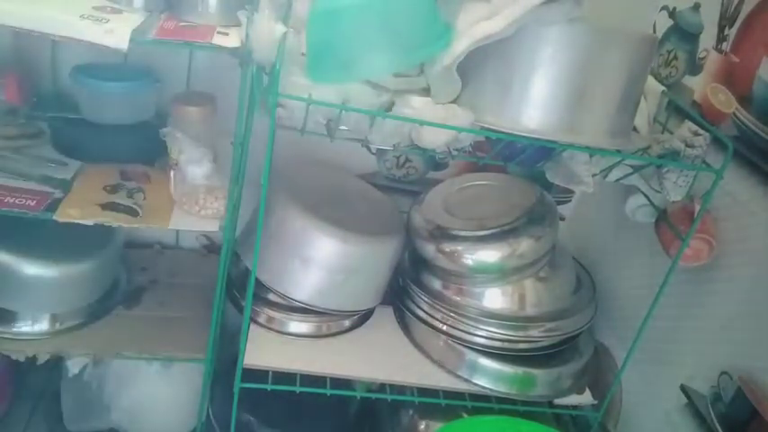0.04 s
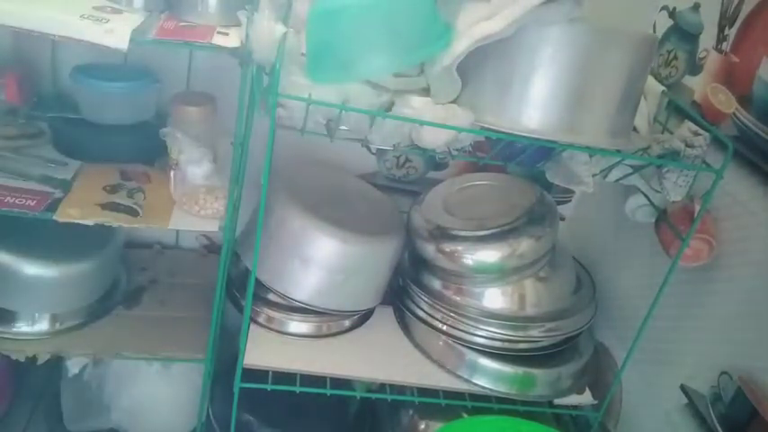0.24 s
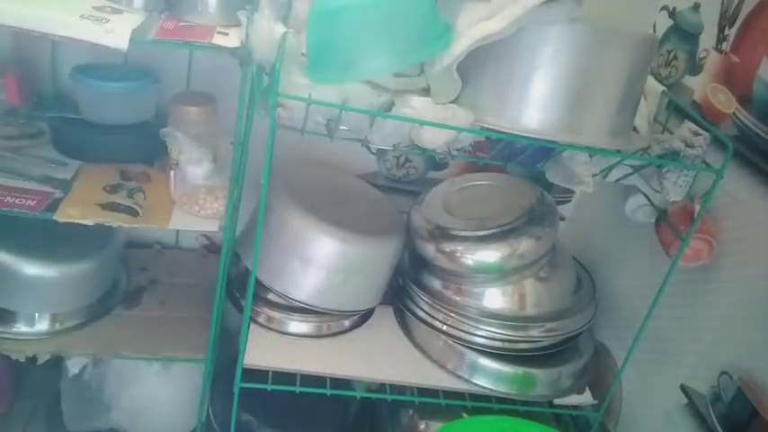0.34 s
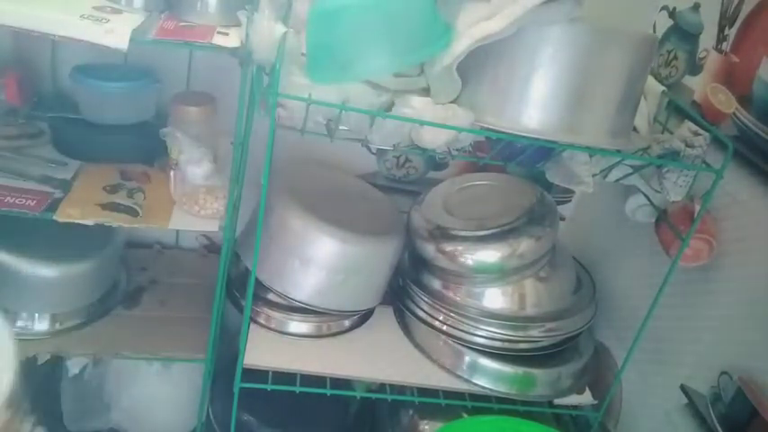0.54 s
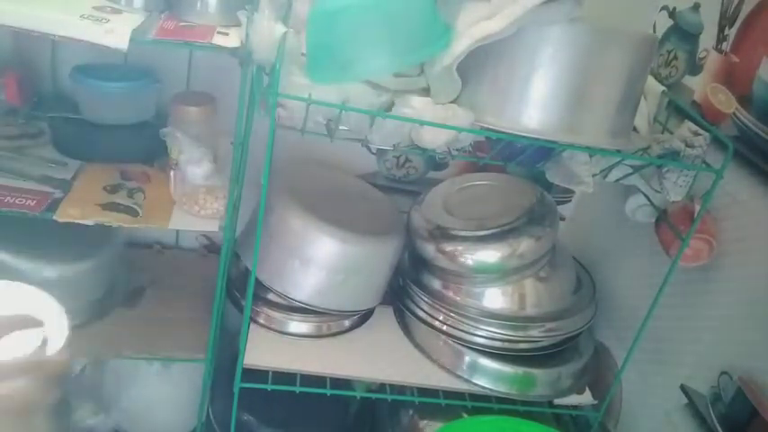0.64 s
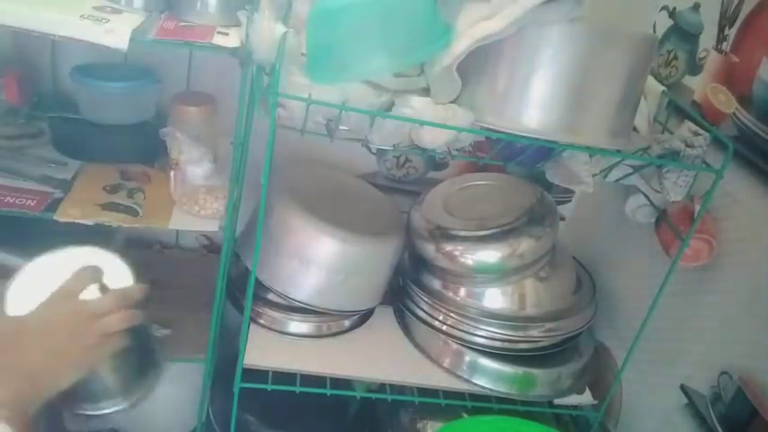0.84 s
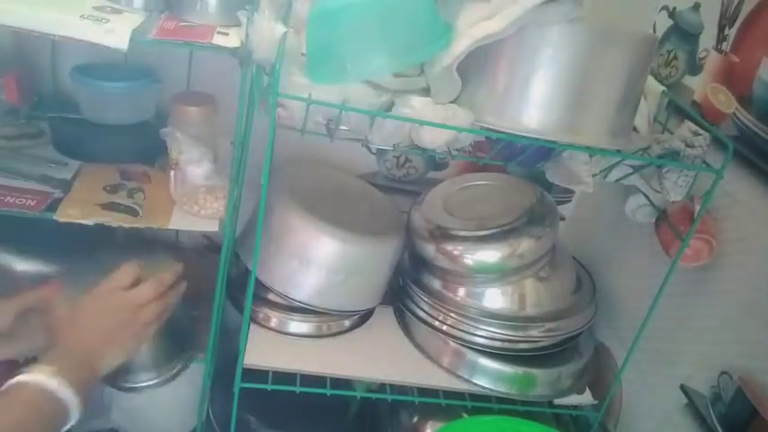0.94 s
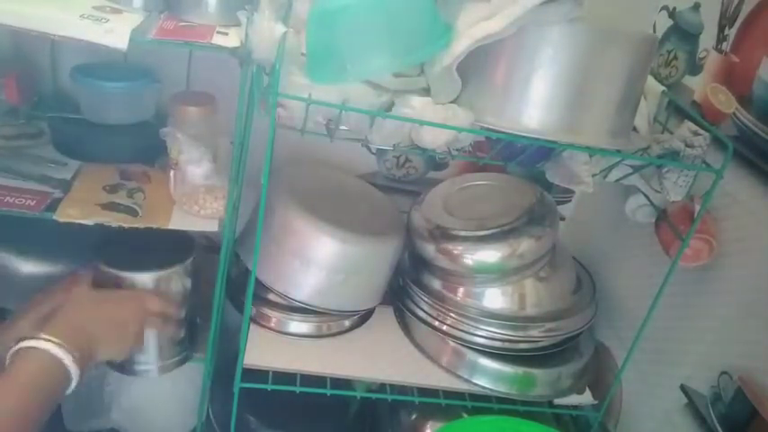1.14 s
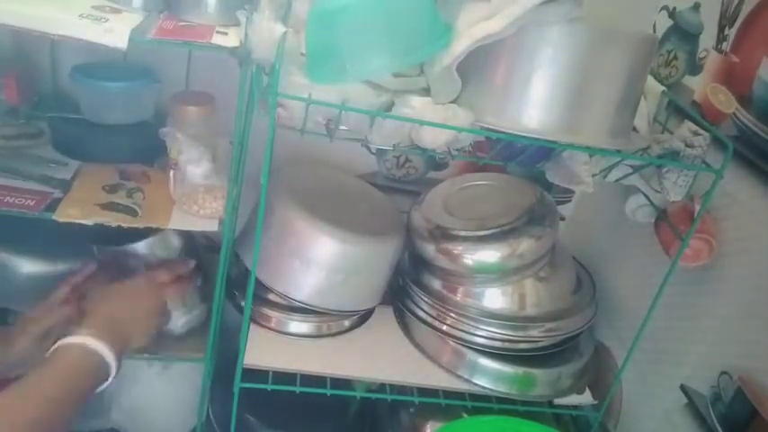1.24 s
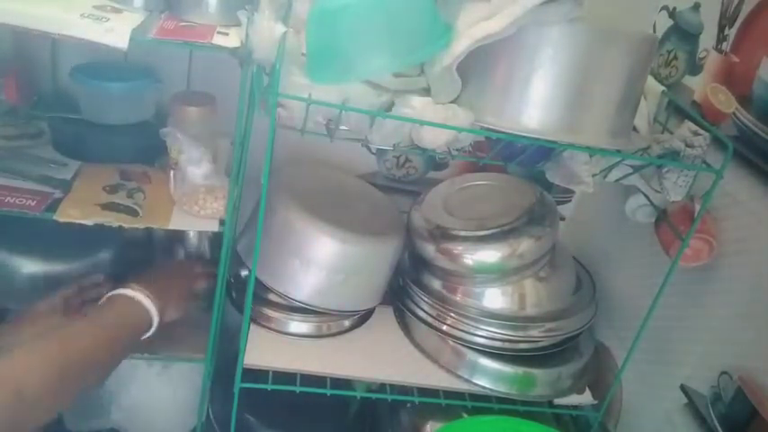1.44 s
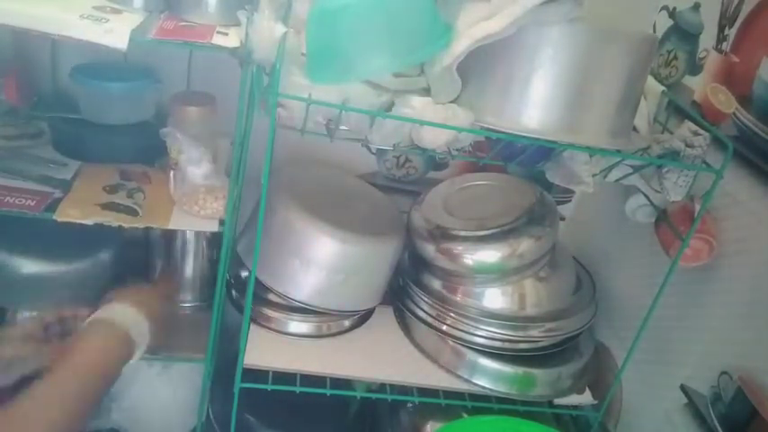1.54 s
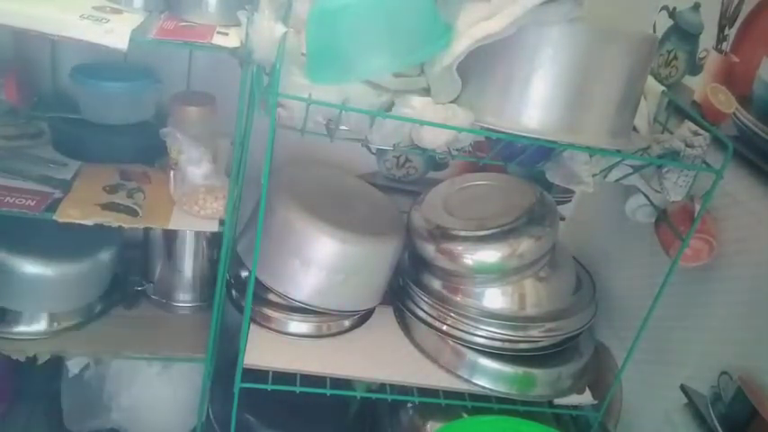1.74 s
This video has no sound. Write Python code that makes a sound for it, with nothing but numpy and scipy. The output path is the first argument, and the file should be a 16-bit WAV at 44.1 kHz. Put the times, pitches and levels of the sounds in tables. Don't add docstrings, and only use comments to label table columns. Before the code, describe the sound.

Stainless steel dishes clank on a wire rack. Faint hum and a bangle tick at 0.1 s, then bright plates clash at 0.2 and 0.35, ringing until 0.5. Soft ticks near 0.6 fade into a gated hush. A tumbler clanks at 0.9, a bowl at 1.2, then lid and pot clatter densely from 1.27 to 1.5. Clear rings fade; a faint low motor lingers. Small kitchen, right channel only.

```python
import sys
import numpy as np
from scipy import signal
from scipy.fft import rfft, irfft, next_fast_len
from scipy.io import wavfile

SR = 44100
rng = np.random.default_rng(int(sys.argv[2]) if len(sys.argv) > 2 else 0)


def store_pcm(level_fs):
    pcm = np.round(np.clip(level_fs, -1, 1) * 32767).astype(np.int16)
    wavfile.write(sys.argv[1], SR, np.atleast_2d(pcm).T)


N = 79380

# (time [s], sheen peak [dB], clank peak [dB], thump peak [dB], t60 [s])
BLOWS = [(0.1975, -17, -28, -44, 0.13), (0.2168, -16, -17.5, -34, 0.26), (0.2299, -9, -24, -39.5, 0.29),
         (0.3498, -11, -27.5, -37.5, 0.24), (0.362, -14, -34, -64, 0.32), (.41, -28, -40, -49.5, 0.46),
         (0.9029, -16, -26, -30.5, 0.28), (0.9477, -14, -33, -34.5, 0.47),
         (0.9677, -16.5, -19.5, -32.5, 0.24), (1.0391, -22, -60, -35, 0.27),
         (1.0745, -17, -34.5, -33, 0.16), (1.1852, -16.5, -27, -37.5, 0.42), (1.267, -12, -33.5, -33, 0.26),
         (1.279, -15.5, -38, -41, .22), (1.292, -18, -38, -44, .2), (1.335, -15, -34, -44, 0.26),
         (1.3799, -14, -36, -40, 0.3), (1.401, -19, -27, -27, 0.18), (1.4453, -22, -28.5, -23.5, 0.22),
         (1.4665, -14, -26, -36, 0.2), (1.5194, -26, -32.5, -29, 0.17)]
# (time [s], sheen peak [dB], clank peak [dB], thump peak [dB], t60 [s])
TICKS = [
    (.111, -36, -59, -64, 0.14),
    (.163, -40.5, -63, -82, 0.23),
    (.188, -35, -46, -56.5, .2),
    (.588, -36, -57.5, -71, 0.14),
    (.668, -42, -57, -55, .15),
    (.848, -58.5, -71, -79, 0.18),
    (1.597, -54, -56.5, -54, .2),
]
# (frequency [Hz], level per mode [dB])
SHEEN = [(4300, -24), (5300, -6.5), (6300, 1.5), (9000, -0.5), (11300, -1), (12500, -11.5), (15500, -16)]
CLANK = [(700, -21), (1100, -1), (2400, -1.5), (3600, -1), (4600, -10), (6000, -20.5)]
THUMP = [(60, -46), (150, -41.5), (280, -2), (600, 1.5), (900, -1.5), (1300, -32.5)]
# (frequency [Hz], ratio [-])
RING_LENGTH = [(200, 0.59), (1000, 1.11), (4000, 1), (8000, 2.46), (15000, 1.13)]
# (frequency [Hz], level [dB], t60 [s])
PLATE = [(640, -4, .12), (1050, 5, .2), (2342, -10, .4), (3540, -3, .15), (5932, -2, .19), (7704, -1, .5),
         (8522, -5, .4), (8888, -3, .3), (9878, -2, .3), (10890, -2, .3)]
PLATE_AGAIN = [(2342, -6, .2), (3542, -13, .3), (4646, -15, .4), (5700, 2, .12), (6288, 2, .26),
               (7978, 2, .19), (8947, 1, .45), (9329, -3, .4), (9695, -7, .8), (10090, -5, .45),
               (11560, -2, .19)]
TUMBLER = [(324, 0, .09), (431, -3, .08), (694, -9, .2), (1051, -6, .12), (2340, 2, .6), (3351, -8, .15),
           (3548, -8, .3), (5351, -8, .12)]
TUMBLER_AGAIN = [(1297, 2, .12), (1515, -11, .3), (1854, -3, .12), (2340, 1, .55), (2568, -12, .27),
                 (3526, -9, .2), (5604, -5, .15), (6013, -6, .3), (6412, -9, .4), (7537, -7, .18),
                 (7938, -6, .2)]
BOWL = [(1550, -10, .15), (2110, 0, .18), (2358, -6, .3), (2524, 3, .1), (3150, -6, .05), (6379, -6, .45),
        (6611, -3, .3), (8920, -6, .18), (10260, -8, .24)]
LID = [(3570, -5, .12), (3990, 5, .06), (5350, 1, .07), (5717, -1, .3), (6072, -2, .25), (6665, -1, .18),
       (7650, -4, .35), (8037, -3, .3), (8320, -6, .4), (9485, -7, .4)]
POT = [(880, 1, .07), (1057, 4, .08), (1301, 5, .07), (1650, 5, .06), (1542, -8, .5), (1917, 9, .05),
       (2116, -3, .13), (3700, -4, .05), (6830, 4, .08)]
POT_AGAIN = [(4075, 3, .077), (4635, 1, .12), (4834, -9, .2), (5222, -6, .2), (6083, 0, .1),
             (6724, -5, .19), (7607, -6, .3), (8242, -8, .4)]
CUP = [(2110, 1, .33), (2859, -24, .5), (4430, -23, .4)]
PLATE_FREED = [(1050, -3, .35), (1518, -8, .5), (1545, 0, .6), (4911, -4, .5), (8960, -6, .5)]
BANGLE = [(5150, -8, .16), (6950, 1, .14), (7300, -2, .1), (10260, 3, .16), (14150, -2, .14)]
BANGLE_PAIR = [(695, 0, .09), (2700, -9, .1), (4400, -13, .12), (7700, -6, .15), (10800, -4, .14),
               (11250, -4, .12)]
PLATE_RIM = [(1728, 0, .25), (4834, -1, .38), (1545, -11, .5), (3391, -6, .25)]
RACK = [(280, -6, .2), (426, -5, .15), (572, 0, .2), (623, 0, .25)]
PLATE_EDGE = [(3550, -5, .1), (7600, 0, .15), (9900, -4, .12)]
LID_AGAIN = [(705, -8, .2), (3311, -4, .2), (3575, 0, .12), (6368, 2, .11), (7817, -3, .4), (8990, 0, .19),
             (10410, -3, .2)]
CUP_RIM = [(4430, -12, .4), (6869, -4, .25), (7074, -2, .3), (7300, -2, .2), (7444, -1, .2), (8543, -3, .3),
           (8942, -5, .5)]
CUP_FREED = [(2110, 4, .45), (2859, -17, .35), (3219, -17, .2), (7074, -17, .2), (8543, -17, .2)]
# (vessel, time [s], level [dB], rise [s]); a slow rise is a damping hand or neighbour letting go
STRIKES = [(PLATE_EDGE, .197, -30, .002), (PLATE, .213, -27.5, 0.0022), (PLATE_RIM, .245, -29.5, 0.01),
           (PLATE_AGAIN, .351, -31, 0.0037), (PLATE_FREED, .44, -32, .06), (TUMBLER, .904, -27.5, 0.0022),
           (TUMBLER_AGAIN, 0.97, -27.5, 0.0023), (RACK, 0.96, -39, 0.0035), (RACK, 1.035, -35.5, 0.0054),
           (BOWL, 1.186, -29.5, 0.0022), (RACK, 1.19, -35.5, 0.0043), (LID, 1.268, -27.5, 0.0027),
           (RACK, 1.268, -34.5, 0.0027), (LID_AGAIN, 1.335, -33, 0.007), (RACK, 1.335, -39, .005),
           (POT, 1.402, -27, .002), (RACK, 1.404, -32.5, .004), (RACK, 1.442, -29.5, 0.0038),
           (POT_AGAIN, 1.46, -27, 0.0025), (CUP, 1.508, -29.5, 0.007), (CUP_RIM, 1.592, -44, .004),
           (CUP_FREED, 1.595, -36.5, 0.012), (CUP_FREED, 1.705, -39.5, .012), (BANGLE, .111, -36, .005),
           (BANGLE, 0.14, -42.5, .005), (BANGLE_PAIR, .588, -37.5, 0.0028), (BANGLE_PAIR, .666, -33, .003)]
# (time [s], level [dB])
THUDS = [
    (0.351, -39.5),
    (0.91, -46),
    (1.27, -49.5),
    (1.461, -43),
]
# (time [s], gain [dB])
GATE = [(.1, -31), (.185, -25.5), (.215, -3.5), (.515, 1.5), (.535, -6.5), (.64, -16.5), (.755, -30),
        (.83, -25), (.897, -23), (.903, -0.5), (1.125, 2.5), (1.18, -2.5), (1.186, -0.5), (1.575, -3),
        (1.59, -9.5), (1.65, -7.5), (1.695, -20), (1.8, -28)]
# (frequency [Hz], level [dB per Hz])
HUM = [(40, -19.5), (100, -21), (150, 0), (700, -0.5), (1500, -2.5), (3000, -9.5), (10000, -17.5),
       (12500, -28)]
# (frequency [Hz], t60 [s])
ROOM = [(200, 0.68), (2000, 0.54), (8000, 0.38), (15000, 0.65)]

TICK_LIFT_DB, SHEEN_DB, CLANK_DB, THUMP_DB = 17, -12, -7.5, -8
SPREAD_DB, ATTACK_S, HISS = 5, 0.00099, 0.75
RING_DB, LUMPY_DB, UNEVEN_DB = -3.5, 5, 1.5
CHATTER_DB = 1.5
WAVER_DB, WAVER_PER_S, WAVER_HZ = 3, 45, 6000
THUD_HZ, THUD_S = 190, 0.0024
REOPEN_S, REOPEN_WIDTH_S, REOPEN_DB = 1.742, 0.043, 10
HUM_DB, HUM_GATED = -59.5, 0.66
DRONE_HZ, DRONE_WIDTH_HZ, DRONE_FROM_S, DRONE_DB = 140, 19, 1.34, -77.5
ROOM_DB, RIGHT_DB, DEAD_DB = -9, 6, -101
BOTTOM_HZ, TOP_HZ = 170, 16240


def amp(db):
    return 10 ** (np.asarray(db) / 20)


def unit(x):
    return x / np.sqrt(np.mean(x ** 2) + 1e-20)


def along(points, hz, outside=None):
    f, v = np.transpose(points)
    return np.interp(np.log(hz + 1), np.log(f + 1), v, outside, outside)


def filtered(x, response):
    m = next_fast_len(x.shape[-1] + 8192)
    spectrum = rfft(x, m) * response(np.fft.rfftfreq(m, 1 / SR))
    return irfft(spectrum, m)[..., :x.shape[-1]]


def without_bass(x):
    return filtered(x, lambda f: f ** 4 / (f ** 4 + BOTTOM_HZ ** 4))


def add(track, s, sound):
    part = track[round(s * SR):][:len(sound)]
    part += sound[:len(part)]


def dying_noise(t60, gain, size=256):
    length = SR // 3
    hz, t, z = signal.stft(rng.standard_normal(length), SR, nperseg=size)
    decay = amp(-60 * t / t60(hz)[:, None])
    return signal.istft(z * gain(hz)[:, None] * decay, SR, nperseg=size)[1][:length]


def gate_db():
    t = np.arange(N) / SR
    breath = REOPEN_DB * np.exp(-((t - REOPEN_S) / REOPEN_WIDTH_S) ** 4)
    return np.interp(t, *np.transpose(GATE)) + breath


def hum():
    house = unit(filtered(rng.standard_normal(N), lambda f: amp(along(HUM, f))))
    motor_band = lambda f: np.exp(-((f - DRONE_HZ) / DRONE_WIDTH_HZ) ** 2)
    drone = unit(filtered(rng.standard_normal(N), motor_band))
    swell = np.clip((np.arange(N) / SR - DRONE_FROM_S) / 0.24, .15, 1)
    return amp(HUM_DB) * house * amp(HUM_GATED * gate_db()) + amp(DRONE_DB) * drone * swell


def kitchen(x):
    tail = dying_noise(lambda f: along(ROOM, f), np.ones_like)
    delayed = np.pad(x, (200, 0))
    return signal.fftconvolve(delayed, tail / np.linalg.norm(tail))[:N]


def thuds():
    out, t = np.zeros(N), np.arange(SR // 2) / SR
    push = t / THUD_S * np.exp(1 - t / THUD_S) * (0.1 + np.sin(2 * np.pi * THUD_HZ * t))
    for s, db in THUDS:
        add(out, s, amp(db) * push)
    return out


def rings():
    out, t = np.zeros(N), np.arange(SR // 2) / SR
    for vessel, s, db, rise_s in STRIKES:
        hz, level_db, t60 = np.transpose(vessel)[..., None]
        knots = rng.standard_normal((2, len(vessel), 60))
        waver = lambda k: np.interp(t * WAVER_PER_S, np.arange(60), k)
        level_flutter, phase_flutter = np.array([[waver(k) for k in rows] for rows in knots])
        loose = np.sqrt(hz / WAVER_HZ)
        decay = amp(db + level_db - 60 * t / t60)
        fade = decay * (1 - np.exp(-t / rise_s)) * np.cos(t / t[-1] * np.pi / 2)
        phase = 2 * np.pi * hz * t + 0.64 * loose * (phase_flutter - phase_flutter[:, :1])
        partials = fade * amp(WAVER_DB * loose * level_flutter) * np.sin(phase)
        add(out, s, np.sum(partials, axis=0))
    return out


def clatter(count=400):
    out, t = np.zeros(N), np.arange(SR // 3) / SR
    hz = 16000 * (np.arange(count) + rng.random(count)) / count
    life = along(RING_LENGTH, hz) * amp(rng.standard_normal(count))
    modes = np.exp((2j * np.pi * hz[:, None] - np.log(1000) / life[:, None]) * t).imag
    lifted = [(s, a + TICK_LIFT_DB, b + TICK_LIFT_DB, c + TICK_LIFT_DB, d) for s, a, b, c, d in TICKS]
    envelope = (1 - np.exp(-t / ATTACK_S)) * (1 - t / t[-1])
    for s, sheen_db, clank_db, thump_db, t60 in list(BLOWS) + lifted:
        def colour(f):
            sheen = amp(sheen_db + SHEEN_DB + along(SHEEN, f, -120) - 21)
            clank = amp(clank_db + CLANK_DB + along(CLANK, f, -120) - 17)
            thump = amp(thump_db + THUMP_DB + along(THUMP, f, -120) - 11)
            return sheen + clank + thump

        strength = amp(SPREAD_DB * rng.standard_normal(count)) * rng.choice([-1, 1], count)
        ring = (colour(hz) * strength) @ modes
        ring = ring * amp(RING_DB - 60 * t * (1 / t60 - 1))

        level_lumps, life_lumps = rng.standard_normal((2, 257))
        rattle = dying_noise(lambda f: t60 * along(RING_LENGTH, f) * amp(UNEVEN_DB * life_lumps),
                             lambda f: colour(f) * amp(LUMPY_DB * level_lumps), size=512)
        contacts = np.repeat(rng.exponential(size=len(t) // 60), 60)
        rattle = rattle * amp(CHATTER_DB * (contacts - 1))

        crack = dying_noise(lambda f: 0.015 + 0 * f, colour)
        add(out, s, (ring + 20 * (HISS * rattle + crack)) * envelope)
    return out


def scene():
    steel = without_bass(clatter() + rings()) + thuds()
    gated = (steel + amp(ROOM_DB) * kitchen(steel)) * amp(gate_db())
    return np.array([np.zeros(N), amp(RIGHT_DB) * (gated + hum())])


def record(dry):
    left_hiss = amp(DEAD_DB) * rng.standard_normal(N) * [[1], [0]]
    return filtered(dry + left_hiss, lambda f: np.clip((TOP_HZ - f) / 500, 0, 1))


dry = scene()
out = record(dry)
store_pcm(out)
```